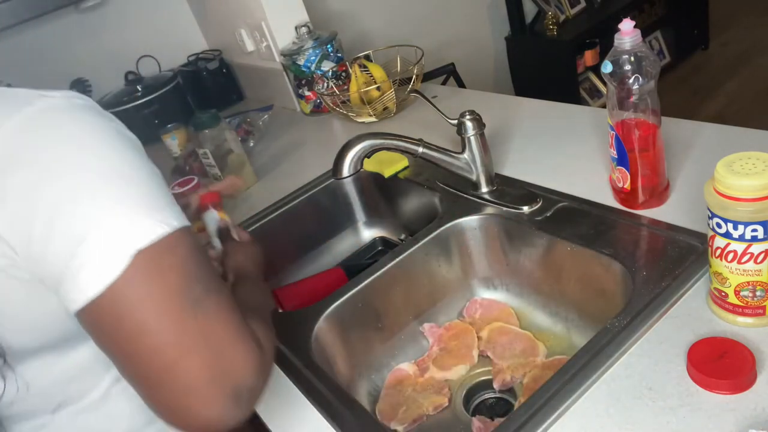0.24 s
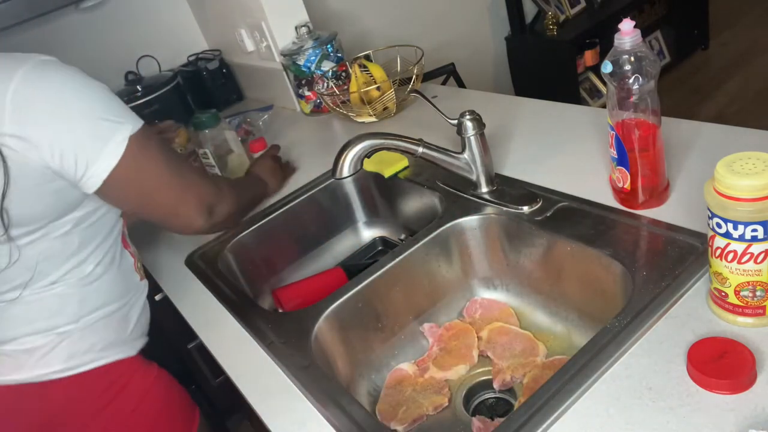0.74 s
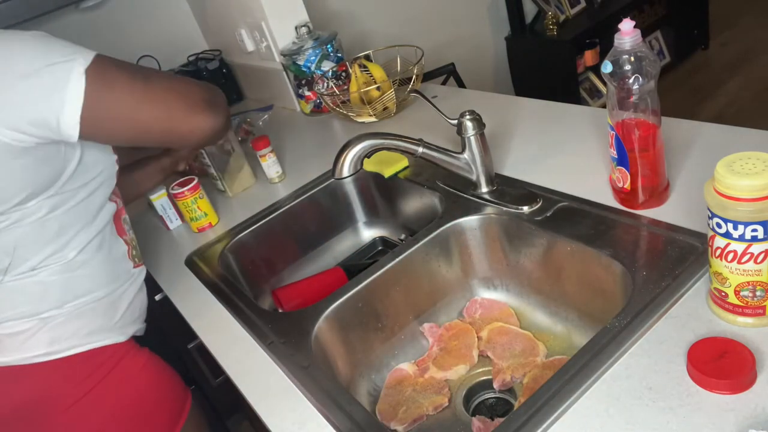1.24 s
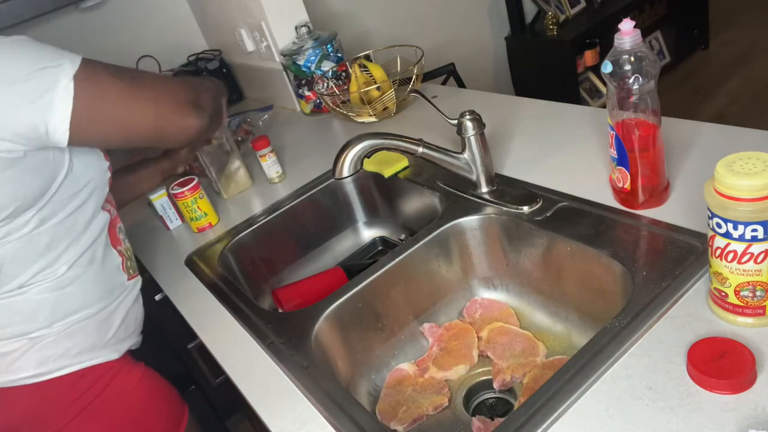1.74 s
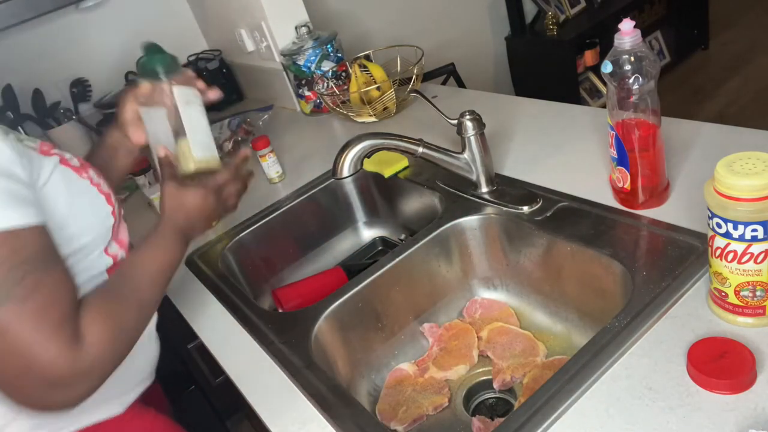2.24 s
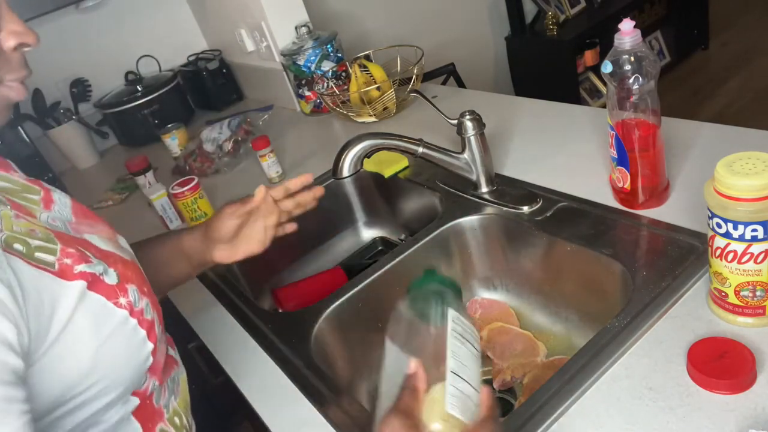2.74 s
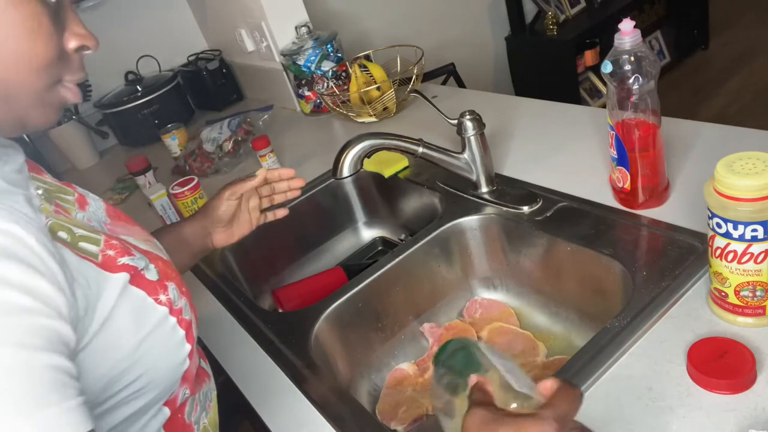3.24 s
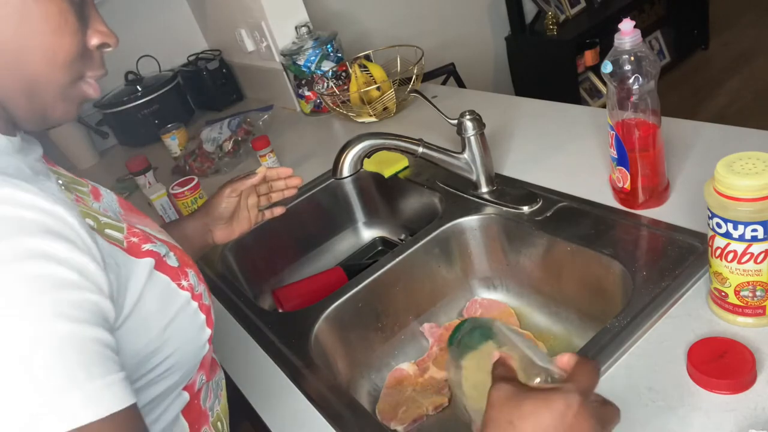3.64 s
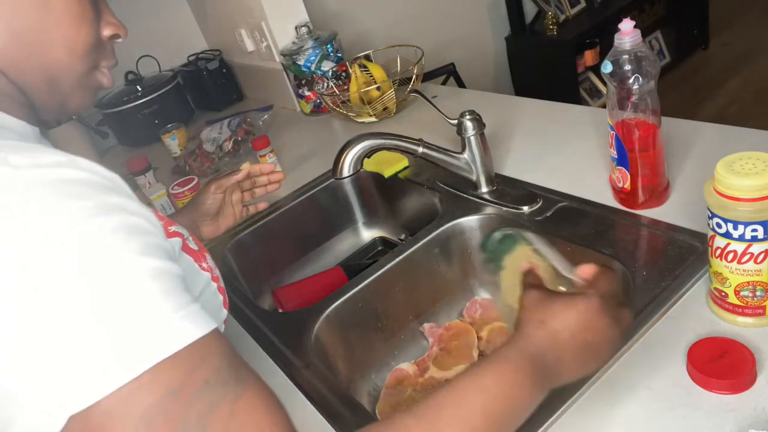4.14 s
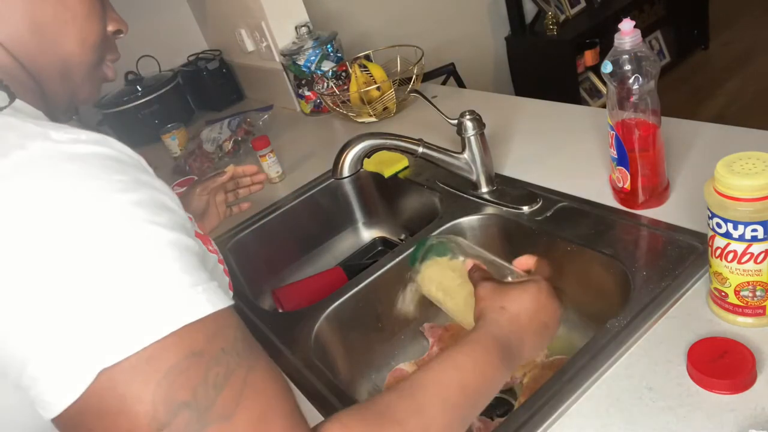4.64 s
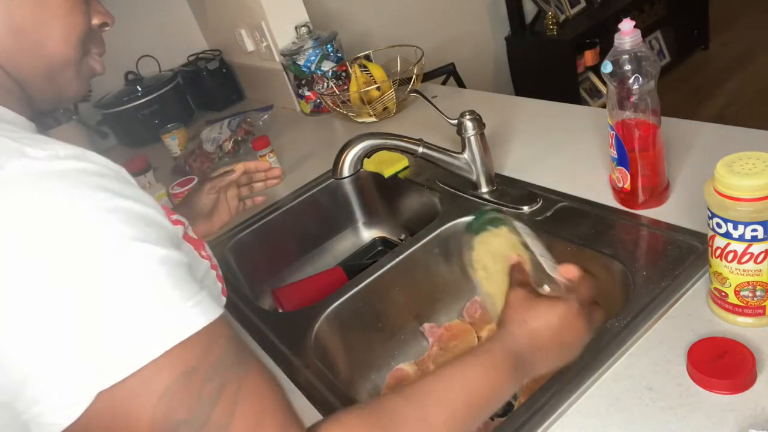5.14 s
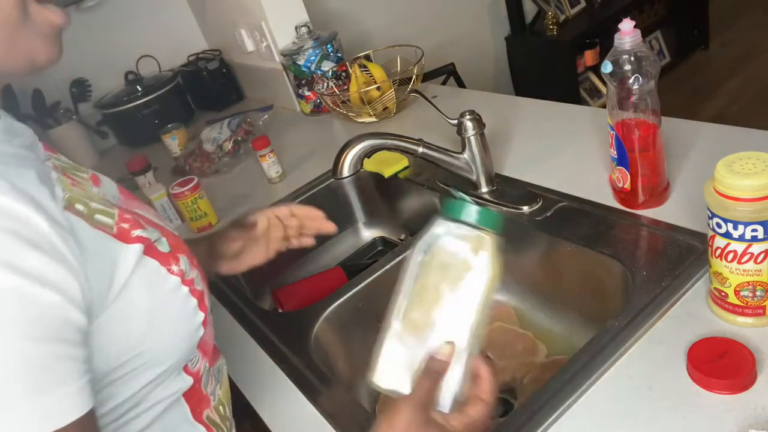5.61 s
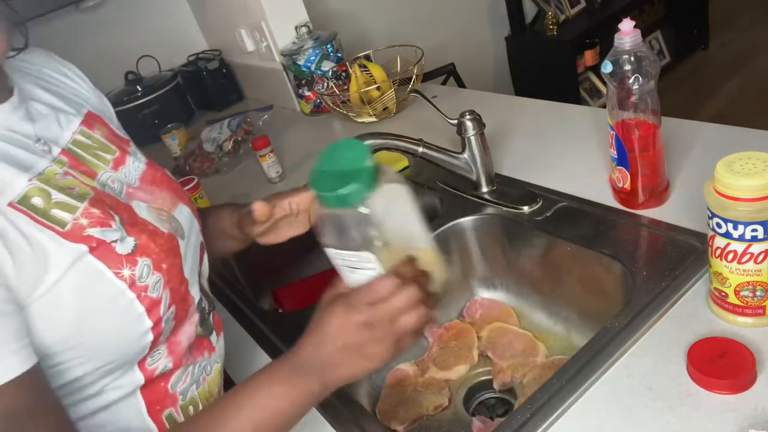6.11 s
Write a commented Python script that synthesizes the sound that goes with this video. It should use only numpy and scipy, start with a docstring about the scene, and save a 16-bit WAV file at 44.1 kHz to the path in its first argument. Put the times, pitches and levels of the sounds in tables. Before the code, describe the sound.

A small shaker's cap snaps shut and the shaker clunks down on a kitchen counter. After some light scrapes and thuds, a big plastic jar knocks loudly. Seasoning is then shaken from it in quick, soft, hissing strokes, the grains ticking into a sink. The lid claps shut and the jar is put down. The sounds are close, with a short echo from hard walls and a steady low fridge hum.

```python
"""After a brief low rustle, a small shaker snaps shut and is put down, and jars knock on a counter.
A big plastic jar is tipped and shaken about five times a second to season meat in the sink:
powder slides along its wall and grains fly out, ticking as they land. Its lid is clapped shut
and it is set down. Hard kitchen walls echo each knock, and a fridge hums in the background."""
import sys
import numpy as np
from scipy import signal
from scipy.fft import rfft, irfft, next_fast_len
from scipy.io import wavfile
from scipy.ndimage import uniform_filter1d

SR = 44100
rng = np.random.default_rng(int(sys.argv[2]) if len(sys.argv) > 2 else 0)


def transcribe(signal):
    """Save signal, clipped to [-1, 1], as a 16-bit WAV file at the path in sys.argv[1]."""
    frames = np.atleast_2d(signal).T
    limited = np.clip(frames, -1, 1)
    pcm = np.round(limited * 32767).astype(np.int16)
    wavfile.write(sys.argv[1], SR, pcm)


N = 280917
TIME = np.arange(N) / SR

# Each shake of the big jar: time_s, powder_db, grains_db, back_swing_db
JAR_SHAKES = [(3.05, -63, -61.5, -78), (3.245, -61.5, -60.5, -73), (3.453, -64, -60, -64.5),
              (3.614, -65, -58.5, -65), (3.82, -68, -56.5, -65), (4.006, -68.5, -60, -58.5),
              (4.202, -62, -55, -62), (4.395, -63.5, -57, -63.5), (4.582, -65.5, -57, -70),
              (4.76, -69.5, -58, -64.5), (4.87, -65, -60, -69), (4.958, -66, -60, -61.5),
              (5.257, -67.5, -57.5, -65.5), (5.45, -80, -66.5, -58.5)]
def shaking():
    """Strength of the sliding powder and of the thrown grains, which rattle again on the back swing."""
    hold_s, back_swing_s = 0.018, 0.093
    slides, throws = [], []
    for s, powder_db, grains_db, back_db in JAR_SHAKES:
        start = s - hold_s / 2
        slides.append((start, hold_s, powder_db))
        throws += [(start, hold_s, grains_db), (start + back_swing_s, hold_s, back_db)]
    return [swells(moves, attack_s=0.09, release_s=0.092) for moves in (slides, throws)]

# Grains keep trickling while the jar is upside down: time_s, level_db
GRAIN_TRICKLE = [(2.9, -70), (3.4, -68), (3.75, -65), (4.65, -69.5), (5.1, -67), (5.52, -68.5)]
# Grains shift as a container is moved: start_s, length_s, level_db
GRAIN_SHIFTS = [(0.34, .04, -72), (0.407, 0.0044, -67), (0.49, .11, -72), (1.03, .02, -73.5),
                (1.15, 0.02, -73), (2.07, 0.094, -71), (2.24, 0.13, -78.5), (2.43, .03, -75),
                (2.53, .08, -75), (2.85, 0.053, -63), (5.2, 0.02, -62), (5.575, .008, -54.5),
                (5.61, 0.13, -56), (5.742, 0.0097, -48.5), (5.895, 0.085, -57), (6.25, 0.16, -77.5)]
# The bright tone of the grains: pitch_hz, gain_db
GRAIN_TONE = [(1200, -27), (3000, -7.5), (4200, -8), (6000, -5), (7800, -1), (10000, 0), (12500, -2),
              (13500, -10), (15000, -38)]
def seasoning(thrown, room):
    """Thousands of grains tick against the jar and the sink; a stronger flow means more of them."""
    shifting = swells(GRAIN_SHIFTS, attack_s=0.033, release_s=0.067)
    flow = np.sqrt(thrown ** 2 + level(GRAIN_TRICKLE) ** 2 + shifting ** 2)
    grains_per_s = 6000 * np.sqrt(flow / from_db(-67.5)) + 1
    lands = rng.random(N) < grains_per_s / SR
    sizes = from_db(2 * np.minimum(rng.exponential(1, N), 5))
    ticks = lands * sizes * rng.standard_normal((2, N)) * flow / np.sqrt(grains_per_s)
    hiss = in_room(shape_tone(ticks, GRAIN_TONE), room, wet_db=-14)
    return pan(rms_one(hiss), 0.5) * np.sqrt(np.mean(flow ** 2)) * from_db(1)

# Hands slide along the big jar to pick it up: start_s, length_s, level_db
HAND_MOVES = [(2.11, 0.048, -75), (2.42, 0.026, -71), (2.56, 0.026, -70)]
# The tone of the rubbed jar wall: pitch_hz, gain_db
WALL_TONE = [(300, -20.5), (700, 0), (1000, -3), (1350, -3), (1900, -8), (2600, -7.5), (3600, -11.5),
             (5200, -10.5), (7500, -22), (14000, -50)]
def jar_wall(powder, room):
    """Powder rubs the inside of the plastic jar, and hands rub the outside."""
    effort = powder + swells(HAND_MOVES, attack_s=0.07, release_s=0.12)
    return rubbing(effort, WALL_TONE, room, rough_db=3, gain_db=2, wet_db=-7, left_db=2.5)

# A container is tipped over: start_s, length_s, level_db
TIP_MOVES = [(0.484, 0.019, -59), (2.805, 0.083, -61)]
# The tone of tumbling powder: pitch_hz, gain_db
TUMBLE_TONE = [(300, -22.5), (750, -6), (1050, -6), (1400, -2), (1900, -6), (2500, -6), (3500, -9.5),
               (5200, -17), (7500, -20), (14000, -54)]
def tipping(room):
    """Powder tumbles with a short swish as its container tips."""
    effort = swells(TIP_MOVES, attack_s=0.024, release_s=0.11)
    return rubbing(effort, TUMBLE_TONE, room, rough_db=1, gain_db=3, wet_db=-6, left_db=3.5)

# The big lid closes: start_s, level_db, right_ear_delay_ms
LID_HITS = [(5.5424, -16.5, 0.099)]
# The tone of the clap: pitch_hz, gain_db
LID_TONE = [(120, -71.5), (200, -16.5), (940, -16), (1130, -1), (1510, -4), (1840, -5), (2380, -3),
            (2900, -15.5), (3820, -20.5), (5010, -21), (7620, -25), (10200, -62.5), (12200, -32.5),
            (15500, -65.5)]
# The notes the lid rings with: pitch_hz, width_hz, level_db
LID_NOTES = [(1330, 160, -8.5), (1733, 340, -11), (2153, 290, -5), (2423, 99, 5.5), (5055, 190, -12),
             (6280, 200, -24)]
def lid_clap(room):
    """The big jar's lid is clapped shut with a sharp crack and a short ring."""
    return knocks(LID_HITS, LID_TONE, room, scatter_db=-1, scatter_s=0.02, wet_db=-2, left_db=3.5,
                  notes=LID_NOTES, ring_db=-6.5, ring_wet_db=5)

# The big jar hits the counter: start_s, level_db, right_ear_delay_ms
JAR_HITS = [(1.5259, -17, 0.062)]
# The tone of the knock: pitch_hz, gain_db
JAR_TONE = [(88, -35.5), (150, -8.5), (234, -0.5), (296, -2.5), (326, -38.5), (453, -12.5), (509, -8.5),
            (827, -14), (1420, -5), (5330, -14), (9540, -13), (12500, -22.5), (15500, -62)]
# The notes the jar rings with: pitch_hz, width_hz, level_db
JAR_NOTES = [(243, 33, -2), (452, 31, 7), (860, 87, 1.5), (1230, 180, -5.5), (2054, 85, 1.5), (2390, 28, 2),
             (2510, 31, 0), (2920, 22, -10.5), (3160, 34, -13.5), (3790, 31, -10.5), (5070, 44, -6.5)]
def jar_knock(room):
    """The big jar knocks on the counter and its body rings."""
    return knocks(JAR_HITS, JAR_TONE, room, scatter_db=4.5, scatter_s=0.18, wet_db=-3, left_db=4.5,
                  notes=JAR_NOTES, ring_db=-8, ring_wet_db=-3)

# The big jar is put down: start_s, level_db, right_ear_delay_ms
LANDING_HITS = [(6.3623, -21.5, 0.083)]
# The tone of its landing: pitch_hz, gain_db
LANDING_TONE = [(60, -9), (170, 4.5), (300, 13), (420, -8.5), (640, 4.5), (1100, -10), (1600, -13),
                (3000, -21.5), (6000, -14), (10500, -5.5), (13500, -16), (15500, -42)]
def jar_landing(room):
    """The big jar meets the counter with one short knock."""
    return knocks(LANDING_HITS, LANDING_TONE, room,
                  scatter_db=8, scatter_s=0.0188, wet_db=-1.5, left_db=0.5)

# The flip cap closes: start_s, level_db, right_ear_delay_ms
CAP_HITS = [(0.0658, -26.5, 0.0053)]
# The tone of the snap: pitch_hz, gain_db
CAP_TONE = [(88, -12), (150, -5.5), (221, -22.5), (766, -10.5), (1110, -15), (1340, -17), (2310, -14.5),
            (2980, -22.5), (4560, -14), (5760, -23.5), (10900, -13), (13300, -22.5), (15500, -59)]
# The notes the cap rings with: pitch_hz, width_hz, level_db
CAP_NOTES = [(740, 120, -2), (1020, 110, -20), (2510, 250, -1), (4400, 240, 0)]
def cap_snap(room):
    """The small shaker's cap snaps shut and rings for a moment."""
    return knocks(CAP_HITS, CAP_TONE, room, scatter_db=4.5, scatter_s=0.04, wet_db=-4, left_db=-0.5,
                  notes=CAP_NOTES, ring_db=-10, ring_wet_db=-6.5)

# The small shaker is put down: start_s, level_db, right_ear_delay_ms
SHAKER_HITS = [(0.6388, -29, 0.027)]
# The tone of its landing: pitch_hz, gain_db
SHAKER_TONE = [(88, -69), (150, -1), (393, 6), (486, -0.5), (649, 2.5), (936, -9.5), (1010, -11.5),
               (2020, -13), (2750, -23.5), (10800, -28), (14200, -35), (15000, -64)]
# The notes the shaker rings with: pitch_hz, width_hz, level_db
SHAKER_NOTES = [(404, 19, 1), (646, 22, -7), (1028, 43, -7.5), (1385, 77, -8), (1790, 49, -13),
                (2355, 65, -14.5), (2930, 300, -15), (4820, 210, -20.5)]
def shaker_landing(room):
    """The small shaker lands with a low clunk and its body rings."""
    return knocks(SHAKER_HITS, SHAKER_TONE, room, scatter_db=18, scatter_s=0.093, wet_db=0.5, left_db=3,
                  notes=SHAKER_NOTES, ring_db=-7.5, ring_wet_db=-0.5)

# Dull thuds: start_s, level_db, pitch_hz, fade_s (time to fall 60 dB)
COUNTER_THUDS = [(1.039, -33, 146, .16), (1.048, -33, 86.8, 0.18), (1.53, -25.5, 195, 0.085),
                 (1.55, -20.5, 75.4, 0.079), (1.643, -39, 47.8, 0.71), (5.817, -30.5, 150, 0.058)]
def thuds(room):
    """The counter and cabinet answer a blow with a soft, low swing."""
    out, t = np.zeros((2, N)), TIME[:SR // 2]
    for s, db, hz, fade_s in COUNTER_THUDS:
        loudness = (1 - np.exp(-t / 0.0035)) * from_db(db - 60 * t / fade_s)
        swing = np.sin(2 * np.pi * hz * t) * loudness
        add(out, s, in_room(pan(swing, 1.9), room, wet_db=-14))
    return out

# The big jar touches the counter: start_s, level_db, right_ear_delay_ms
TOUCH_HITS = [(1.4042, -37.5, 0.059)]
# The tone of the touch: pitch_hz, gain_db
TOUCH_TONE = [(200, -4.5), (450, -7.5), (900, -7), (1300, -9.5), (1800, -7.5), (2550, -10.5), (3800, -19),
              (7000, -14.5), (10500, -14.5), (13300, -25.5), (15500, -42)]
# The notes it sets ringing: pitch_hz, width_hz, level_db
TOUCH_NOTES = [(940, 72, -0.5), (2430, 290, -12.5)]
def jar_touch(room):
    """The big jar bumps the counter lightly just before its loud knock."""
    return knocks(TOUCH_HITS, TOUCH_TONE, room, scatter_db=13, scatter_s=0.058, wet_db=3, left_db=2,
                  notes=TOUCH_NOTES, ring_db=-1, ring_wet_db=-14.5)

# How the opening tail fades: time_s, level_db
TAIL_CURVE = [(0, -38), (0.05, -46.5), (0.09, -49), (0.12, -77)]
# The tone of the tail: pitch_hz, gain_db
TAIL_TONE = [(120, -38.5), (200, -14.5), (393, 1.5), (719, -17), (890, -9), (1660, -9.5), (2830, -18.5),
             (4490, -19.5), (9470, -23.5), (12600, -35), (14000, -85.5)]
def opening_tail(room):
    """The fading tail of a knock, heard as a brief low rustle."""
    return rubbing(level(TAIL_CURVE), TAIL_TONE, room, rough_db=1, gain_db=-0.5, wet_db=0, left_db=5.5)

# Small pushes: start_s, length_s, level_db
NUDGE_MOVES = [(1.04, 0.017, -64.5), (1.1, .035, -68), (1.215, .01, -65.5), (1.272, .012, -64),
               (1.312, .01, -64), (5.815, 0.0038, -52.5), (5.86, 0.1, -59.5)]
# The tone of their scraping: pitch_hz, gain_db
NUDGE_TONE = [(250, -14), (500, 11.5), (850, 10), (1400, 6), (1900, -2.5), (2600, -23.5), (6000, -30),
              (14000, -48)]
def nudges(room):
    """Bottles scrape over the counter and a palm shifts on the jar."""
    effort = swells(NUDGE_MOVES, attack_s=0.025, release_s=0.054)
    return rubbing(effort, NUDGE_TONE, room, rough_db=6, gain_db=2, wet_db=-6.5, left_db=4)

# Light taps: start_s, level_db, pitch_hz
LIGHT_TAPS = [(1.035, -62.5, 1240), (1.209, -64.5, 1166), (2.424, -74, 1800), (3.579, -47.5, 10200),
              (4.078, -59, 12060), (6.213, -63.5, 10760)]
# The taps lose their highest treble: pitch_hz, gain_db
TAP_TREBLE_CUT = [(12800, 0), (15500, -33.5)]
def taps(room):
    """Fingers and bottles tap lightly, each tap strongest around one pitch."""
    out = np.zeros((2, N))
    for s, db, hz in LIGHT_TAPS:
        tone = [(hz / 3, -28), (hz * 0.97, -2), (hz, 0), (hz * 3.3, -9), (hz * 4, -30), (hz * 9, -50)]
        out += knocks([(s, db, 0)], tone, room,
                      scatter_db=13.5, scatter_s=0.027, wet_db=-4.5, left_db=3.5)
    return shape_tone(out, TAP_TREBLE_CUT)

# The notes of the fridge motor: pitch_hz, level_db, phase_between_ears_rad
MOTOR_NOTES = [(59.2, -48.5, 0.29), (119, -58.5, 0.36), (178.4, -72, .6), (238.6, -72, 1.7),
               (369, -72.5, 2)]
# The tone of its fan: pitch_hz, gain_db
FAN_TONE = [(82, -36), (140, -5.5), (189, 2.5), (210, -9), (249, 8), (363, -5.5), (389, -14), (461, -4),
            (614, -19.5), (1500, -30), (1950, -57), (3300, -120)]
def fridge():
    """A motor hums, its higher notes wavering more, over a rushing fan and a thin electrical whine."""
    hum = np.zeros((2, N))
    for k, (hz, db, ear_phase) in enumerate(MOTOR_NOTES):
        waver = min(0.06 + 0.25 * k, 0.8)
        loudness = from_db(db + 4 * waver * drift(5))
        phase = 2 * np.pi * hz * TIME + waver * drift(4)
        hum += np.sqrt(2) * loudness * np.sin(phase + np.array([[ear_phase], [0]]))
    whine_hz, whine_db = 7830, -86.5
    whine = from_db(whine_db) * np.sqrt(2) * np.sin(2 * np.pi * whine_hz * TIME + 1.5 * drift(120))
    rush = rng.standard_normal((2, N)) + 0.51 * rng.standard_normal(N)
    fan = from_db(-60) * rms_one(shape_tone(rush, FAN_TONE))
    return pan(hum, 3.9) + whine + pan(fan, 3)

# The tone of the room's air: pitch_hz, gain_db
AIR_TONE = [(15, -39.5), (25, -12), (49, 4), (73, 5.5), (135, -9.5), (176, -27), (264, -16.5), (354, -4),
            (655, -52), (1210, -43.5), (1670, -48.5), (5570, -64.5), (8100, -57), (11500, -62),
            (15000, -84)]
def room_air():
    """The quiet room: a rumble partly shared by both ears, plus air and hiss that differ at each."""
    rumble_tone = [(20, -29), (35, -8), (45, -3), (80, 6), (130, -4), (200, -16), (500, -45), (3000, -91)]
    hiss_tone = [(500, 1.5), (1300, -0.5), (2500, -9), (5000, -12.5), (9000, -12), (13000, -14.5),
                 (14500, -51.5)]
    partly_shared = rng.standard_normal(N) + 0.74 * rng.standard_normal((2, N))
    rumble = rms_one(shape_tone(partly_shared, rumble_tone))
    air = rms_one(shape_tone(rng.standard_normal((2, N)), AIR_TONE))
    hiss = rms_one(shape_tone(rng.standard_normal((2, N)), hiss_tone))
    return pan(from_db(-57) * rumble + from_db(-64.5) * air + from_db(-74.5) * hiss, 2.8)

# How long the echo takes to fall 60 dB: pitch_hz, fade_s
ECHO_FADES = [(100, 0.79), (300, .48), (700, 0.64), (2000, 0.66), (5000, 0.7), (9000, 0.5), (14000, .38)]
def kitchen_echo():
    """Hard walls give an echo that builds up quickly; each band of pitches fades at its own rate."""
    t = TIME[:SR * 4 // 5]
    noise = rfft(rng.standard_normal((2, len(t))))
    hz = np.arange(len(t) // 2 + 1) * SR / len(t)
    edges_hz = np.append(0, np.geomspace(150, SR / 2, 14))
    echo = 0
    for low, high in zip(edges_hz, edges_hz[1:]):
        band = irfft(noise * ((hz >= low) & (hz < high)), len(t))
        echo += band * from_db(-60 * t / at_hz(ECHO_FADES, (low + high) / 2))
    return energy_one(echo * (1 - np.exp(-t / 0.0011)))

def knocks(hits, tone, room, scatter_db, scatter_s, wet_db, left_db, notes=(), ring_db=0, ring_wet_db=0):
    """Each hard hit makes a crack, plus the ring of the object if it has notes."""
    out = np.zeros((2, N))
    for s, db, delay_ms in hits:
        contact = shape_tone(crack(scatter_db, scatter_s), tone, delay_ms)
        hit = in_room(energy_one(contact), room, wet_db)
        if len(notes):
            hit += from_db(ring_db) * in_room(ring(notes), room, ring_wet_db)
        gain = from_db(db) * np.sqrt(SR / 100)  # db is the crack's level if spread over 10 ms
        add(out, s, gain * pan(hit, left_db))
    return out

def crack(scatter_db, scatter_s):
    """One sharp click, then a dense scatter off the steel and the counter."""
    t = TIME[:SR * 9 // 10]
    scatter = rng.standard_normal((2, len(t))) * from_db(-60 * t / scatter_s)
    out = from_db(scatter_db) * energy_one(scatter)
    out[:, 0] += 1  # the click
    return out

def ring(notes):
    """A struck object's notes: wider ones die sooner, higher ones differ more between the ears."""
    t, out = TIME[:SR * 9 // 10], 0
    for hz, width_hz, db in notes:
        phase = rng.standard_normal((2, 1)) * min(hz / 2500, 1)
        loudness = from_db(db) * width_hz * np.exp(-np.pi * width_hz * t)
        out += loudness * np.cos(2 * np.pi * hz * t + phase)
    return energy_one(out * (1 - np.exp(-t / 0.0004)))

def rubbing(effort, tone, room, rough_db, gain_db, wet_db, left_db):
    """A rustle like uneven friction on plastic: flickering noise that grows with the effort."""
    noise = rng.standard_normal((2, N)) * from_db(rough_db * drift(90))
    friction = rms_one(shape_tone(noise, tone))
    return pan(in_room(friction * effort, room, wet_db), left_db) * from_db(gain_db)

def in_room(x, room, wet_db):
    """A sound plus its echo; wet_db is the echo's level compared with the sound."""
    echo = signal.fftconvolve(x, room, axes=1)[:, :x.shape[1]]
    return x + from_db(wet_db) * energy_one(echo) * np.sqrt(np.sum(x ** 2) / 2)

def shape_tone(x, tone, delay_ms=0):
    """Turn each pitch up or down by a tone table; the right ear hears it delay_ms later."""
    size = 2 * next_fast_len(x.shape[1] // 2 + 2048)
    hz = np.arange(size // 2 + 1) * SR / size
    # A minimum-phase filter: nothing rings before the sound starts.
    cepstrum = irfft(np.log(from_db(at_hz(tone, hz))))
    cepstrum[1:size // 2] *= 2
    cepstrum[size // 2 + 1:] = 0
    delay = np.exp(-2j * np.pi * hz * np.array([[0], [delay_ms]]) / 1000)
    return irfft(rfft(x, size) * np.exp(rfft(cepstrum)) * delay)[:, :x.shape[1]]

def swells(moves, attack_s, release_s):
    """Loudness of movements: each rises 20 dB per attack_s, holds, then falls 20 dB per release_s."""
    t, power = TIME[::20], 0
    for s, length_s, db in moves:
        away = np.maximum(s - t, 0) / attack_s + np.maximum(t - s - length_s, 0) / release_s
        power += from_db(db - 20 * np.minimum(away, 10)) ** 2
    return np.interp(TIME, t, np.sqrt(power))

def level(points):
    """Smooth loudness through (time_s, level_db) points, silent outside them."""
    db = np.interp(TIME, *np.transpose(points), left=-150, right=-150)
    return uniform_filter1d(from_db(db), size=300)

def drift(steps_per_s):
    """A random wander around zero, about 1 in size."""
    points = rng.standard_normal(int(N / SR * 100))
    return np.interp(TIME * steps_per_s, np.arange(len(points)), points)

def at_hz(table, hz):
    """Read between a table's rows, with octaves evenly spaced."""
    pitches, values = np.transpose(table)
    return np.interp(np.log(np.maximum(hz, 1)), np.log(pitches), values)

def from_db(db):
    """Turn decibels into a multiplier."""
    return 10 ** (np.asarray(db) / 20)

def rms_one(x):
    """Scale to an average power of 1."""
    return x / np.sqrt(np.mean(x ** 2) + 1e-20)

def energy_one(x):
    """Scale to a total energy of 1 at each ear."""
    return x / np.sqrt(np.sum(x ** 2, axis=-1, keepdims=True) + 1e-20)

def pan(x, left_db):
    """Make the left ear left_db louder than the right."""
    return x * from_db([[left_db / 2], [-left_db / 2]])

def add(out, start_s, sound):
    """Mix a stereo sound in at start_s."""
    start = int(np.clip(round(start_s * SR), 0, N - 1))
    out[:, start:start + sound.shape[1]] += sound[:, :N - start]

def scene():
    """All the sounds meet in one kitchen."""
    room = kitchen_echo()
    powder, thrown = shaking()
    shaker = cap_snap(room) + shaker_landing(room)
    big_jar = jar_touch(room) + jar_knock(room) + lid_clap(room) + jar_landing(room)
    rustles = jar_wall(powder, room) + tipping(room) + opening_tail(room) + nudges(room)
    bumps = taps(room) + thuds(room)
    return seasoning(thrown, room) + shaker + big_jar + rustles + bumps + fridge() + room_air()

# How much left and right differ: pitch_hz, side_gain_db
STEREO_WIDTH = [(100, 0), (300, 1), (1200, 1), (4500, -0.5), (6000, 0), (7600, -20.5), (9000, -29),
                (10800, -6.5), (13000, 6), (14500, 4.5)]
def record(dry):
    """The stereo sound narrows near 8 kHz and is wider in the highest treble."""
    low_cut_hz, high_cut_hz = 34, 16200
    mid, side = (dry[0] + dry[1]) / 2, (dry[0] - dry[1]) / 2
    side = shape_tone(side[None], STEREO_WIDTH)[0]
    bass_cut = signal.butter(2, low_cut_hz, "high", fs=SR, output="sos")
    treble_cut = signal.ellip(10, 0.1, 80, high_cut_hz, fs=SR, output="sos")
    ears = signal.sosfilt(bass_cut, [mid + side, mid - side])
    rounded = 0.9 * np.tanh(ears / 0.9)  # softens the loudest peaks
    return signal.sosfilt(treble_cut, rounded)

dry = scene()
out = record(dry)
transcribe(out)
```